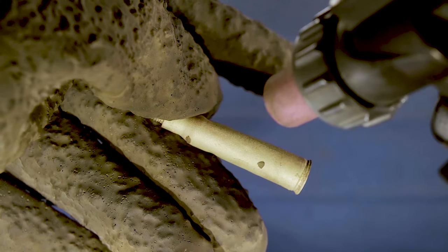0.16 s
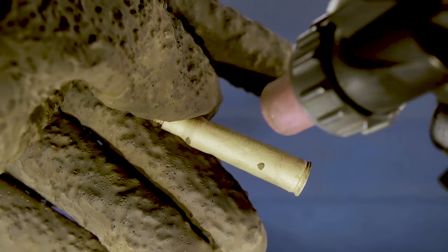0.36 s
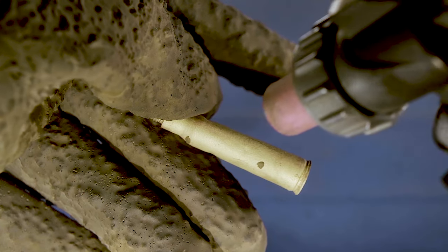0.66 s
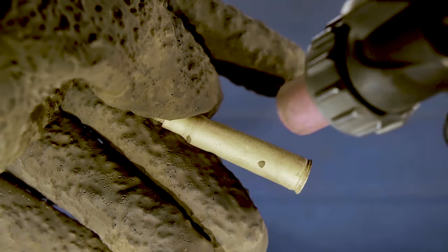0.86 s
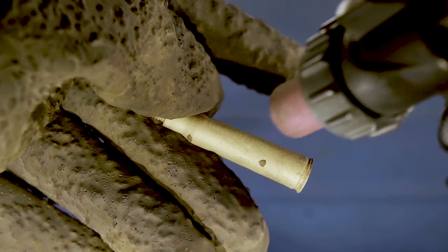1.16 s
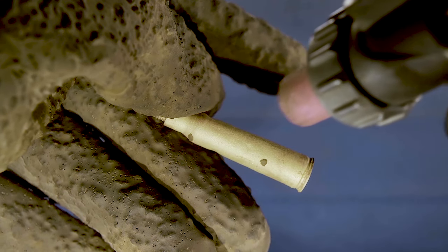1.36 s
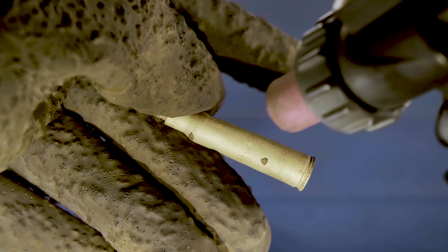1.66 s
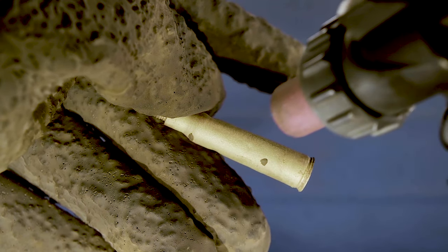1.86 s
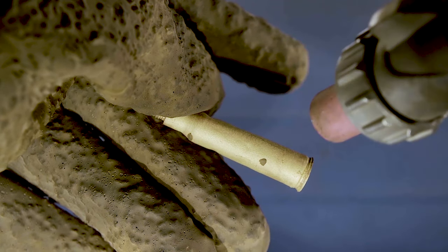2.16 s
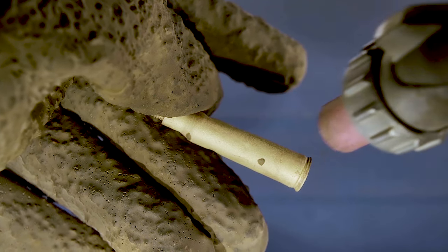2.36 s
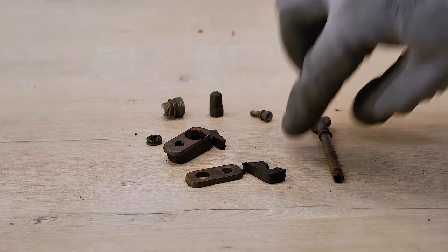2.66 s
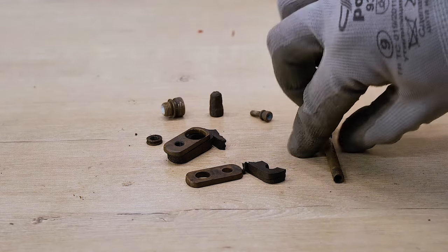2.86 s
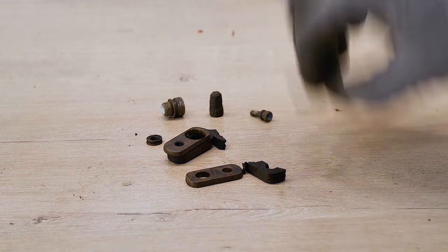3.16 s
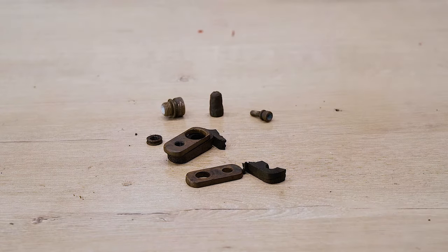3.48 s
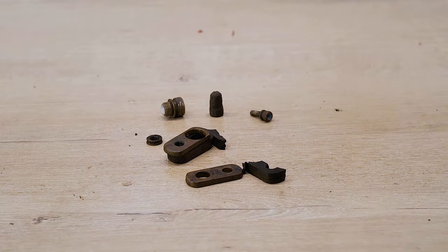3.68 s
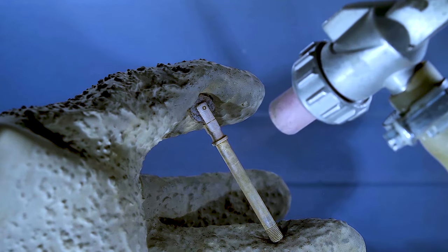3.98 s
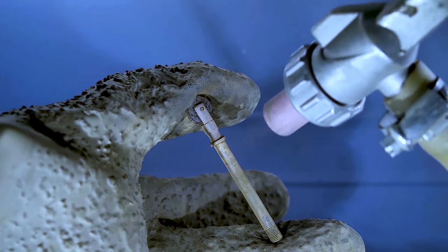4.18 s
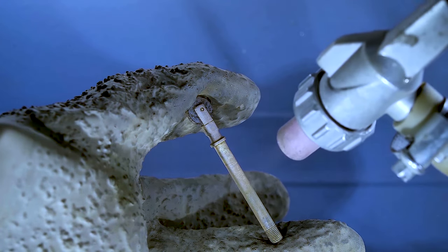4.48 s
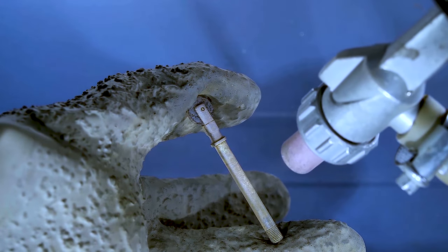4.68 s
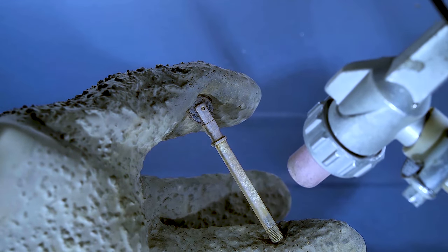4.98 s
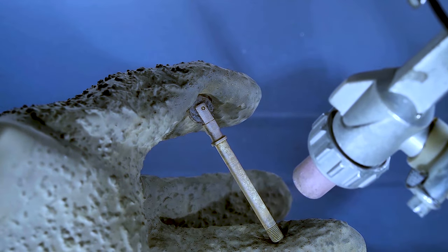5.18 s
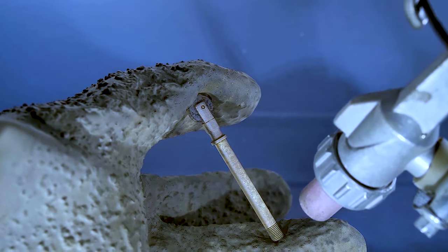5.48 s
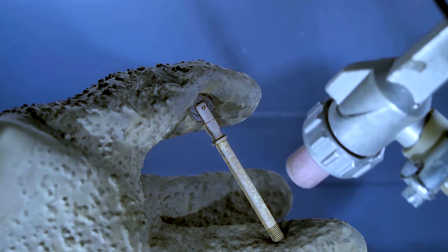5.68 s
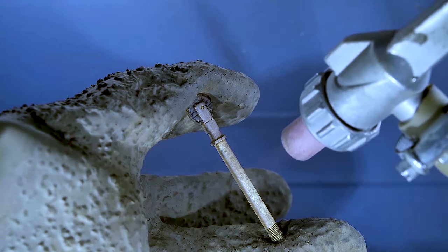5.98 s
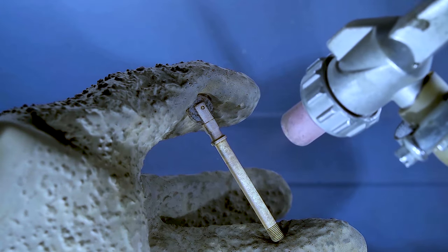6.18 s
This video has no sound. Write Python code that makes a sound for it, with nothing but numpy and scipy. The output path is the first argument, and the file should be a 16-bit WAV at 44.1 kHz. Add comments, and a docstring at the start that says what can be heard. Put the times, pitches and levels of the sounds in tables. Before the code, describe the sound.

A sandblaster spits once, then hisses steadily against a small brass case, with a slight ringing edge and a faint compressor hum beneath. It cuts off. In the quiet, a gloved hand picks a steel bolt off a wooden bench with a small rattling knock. A soft rush swells into a second, smoother and brighter blast with faint whistles and a low motor drone, heard close up in a workshop cabinet.

```python
"""A spit of hiss, a short gap, then steady sandblasting: turbulent air and grit excite the resonances
of a brass case in a workshop cabinet while a compressor hums. In a quiet pause a steel bolt is picked
off a wooden bench, whose damped modes sound as a knock, and a soft rush swells. Then the bolt is
blasted with a smoother, brighter jet over the beating drone of the extractor's two motors.
Now and then the jet catches an edge and whistles."""
import sys
import numpy as np
from scipy import signal
from scipy.fft import rfft, irfft, next_fast_len
from scipy.io import wavfile
from scipy.ndimage import map_coordinates

SR = 44100
rng = np.random.default_rng(int(sys.argv[2]) if len(sys.argv) > 2 else 0)


def unload_audio(sound):
    """Save the sound as a 16-bit wav file, at the path given as the first command line argument."""
    columns = np.transpose(np.atleast_2d(sound))
    # keep every value between -1 and 1, then stretch to whole-number steps
    steps = np.round(np.clip(columns, -1, 1) * 32767)
    wavfile.write(sys.argv[1], SR, steps.astype(np.int16))


N = 279594
T = np.arange(N) / SR
FFT_SIZE = next_fast_len(N, True)
HZ = np.maximum(np.arange(FFT_SIZE // 2 + 1) * SR / FFT_SIZE, 1)
CASE_END_S, BOLT_START_S = 2.555, 3.803   # the pause lies between them
HALF_EACH_SIDE = np.array([[.5], [-.5]])   # shares out a left-minus-right difference


def from_db(db):
    """Amplitude ratio: a factor of ten for every 20 dB."""
    return np.exp(np.asarray(db) * (np.log(10) / 20))


def rms_one(x):
    """Normalisation to unit mean power."""
    return x / np.sqrt(np.mean(x ** 2) + 1e-20)


def at_hz(points):
    """Interpolation of a table along a logarithmic frequency axis."""
    hz, value = np.transpose(points)
    return np.interp(np.log(HZ), np.log(np.sort(hz)), value)


def to_sound(spectrum):
    """Fourier synthesis of a stereo signal."""
    return irfft(spectrum, FFT_SIZE)[:, :N]


def after(s):
    """A unit step spread over 4 ms."""
    return np.clip((T - s) / .004 + .5, 0, 1)


def ramp(start_s, rise_s):
    """Linear rise from 0 to 1, then held."""
    return np.clip((T - start_s) / rise_s, 0, 1)


def stroke(peak_s, level_db, rise_s, fall_s):
    """Exponential growth and decay: 60 dB in rise_s and in fall_s."""
    return from_db(level_db - 60 * np.maximum((peak_s - T) / rise_s, (T - peak_s) / fall_s))


def drift(rate_hz):
    """Low-passed noise: a slow random fluctuation of unit rms."""
    step, settle = 40, 2000
    pole = np.exp(-2 * np.pi * rate_hz * step / SR)
    white = rng.standard_normal(N // step + settle + 2)
    slow = signal.lfilter([1], [1, -2 * pole, pole * pole], white)[settle:]
    return np.interp(np.arange(N) / step, np.arange(len(slow)), rms_one(slow))


def coloured(source, colour, correlation):
    """Partial coherence: sum and difference of two independent sources, filtered, at unit rms."""
    mid, side = rfft(source, FFT_SIZE)
    pair = np.sqrt(1 + correlation) * mid + np.sqrt(1 - correlation) * side * [[1], [-1]]
    low_cut = np.minimum(HZ / colour[0][0], 1) ** 2
    high_cut = 1 / (1 + (HZ / colour[-1][0]) ** 40)
    return rms_one(to_sound(pair * low_cut * high_cut * from_db(at_hz(colour))))


def noise(colour, correlation):
    """Gaussian stereo noise with a given spectral envelope."""
    return coloured(rng.standard_normal((2, N)), colour, correlation)


def resonance(x, hz, width_hz):
    """A damped resonator: two-pole band-pass with unit peak gain."""
    r = np.exp(-np.pi * width_hz / SR)
    feedback = [1, -2 * r * np.cos(2 * np.pi * hz / SR), r * r]
    return signal.lfilter(np.array([1, 0, -1]) * (1 - r * r) / 2, feedback, x)


def band(x, hz, width_hz):
    """Two resonators in cascade pass a band with steeper skirts, at unit rms."""
    return rms_one(resonance(resonance(x, hz, width_hz), hz, width_hz))


def resonate(x, rings, wander_db):
    """Resonant filters of fluctuating strength lift or hollow narrow bands."""
    return x + sum((from_db(lift_db) - 1) * from_db(wander_db * drift(2.5)) * resonance(x, hz, width)
                   for hz, width, lift_db in rings)


def background():
    """Noise floor: faint noise in the pause, strongest at the lowest frequencies."""
    # spectrum of the background noise: (frequency [Hz], relative level [dB])
    colour = [(5, -6), (12, -16.5), (40, -23.5), (85, -30), (160, -43.5), (700, -45), (2000, -49.5),
              (10500, -52)]
    return from_db(-73.5) * noise(colour, correlation=.27) * after(CASE_END_S)


def draught():
    """The extractor's airflow: low noise that decays exponentially under the second blast."""
    # spectrum of the airflow: (frequency [Hz], relative level [dB])
    colour = [(20, -16), (70, -8), (170, -5.5), (260, -3)]
    fade_db = 5 * np.maximum(T - BOLT_START_S, 0)
    return from_db(-69.5 - fade_db) * noise(colour, correlation=.36) * after(BOLT_START_S)


def machine(base_hz, tones):
    """Rotation is periodic: harmonics stay locked to the wavering shaft while their levels throb."""
    speed_waver, throb_db = .0004, 1.1
    turns = np.cumsum(base_hz * (1 + speed_waver * drift(1.4))) / SR
    hum = 0
    for harmonic, level_db in tones:
        amplitude = np.sqrt(2) * from_db(level_db + throb_db * drift(1.8))
        hum = hum + amplitude * np.sin(2 * np.pi * (harmonic * turns + rng.random()))
    return hum


def compressor():
    """Harmonic series of compressor and fan over a broadband rumble, heard until the pause."""
    # partials of compressor and fan: (harmonic number, level [dB])
    tones = [(1, -81), (4, -74), (5, -78), (6, -79), (7, -73), (8, -65.7), (10, -77), (11, -70.5),
             (12, -72.5), (18, -71), (28, -77)]
    fan_tones = [(1, -72.5), (3, -78)]
    # spectrum of the rumble: (frequency [Hz], relative level [dB])
    colour = [(30, -6), (120, -16), (160, -1), (220, -22), (350, -4.5), (540, 1), (690, -7), (830, -8.5),
              (1000, -17.5), (2050, -14.5), (2220, -22.5), (3200, -29), (3800, -35), (5150, -20.5),
              (5500, -36), (6200, -42), (13000, -47)]
    # its resonances: (frequency [Hz], bandwidth [Hz], lift [dB])
    rings = [(2710, 77, 11.5), (5660, 40, 10)]
    rumble = from_db(-63) * resonate(noise(colour, correlation=.97), rings, wander_db=3)
    hum = machine(base_hz=39.965, tones=tones) + machine(base_hz=176, tones=fan_tones)
    idle_gain = from_db(3.3 * (1 - after(.29)))   # a little stronger before the long blast
    return idle_gain * (hum + rumble) * (1 - after(CASE_END_S))


def extractor():
    """Beats: two motors at slightly different speeds interfere, beside the tone of a fan."""
    # partials of the two motors and the fan: (harmonic number, level [dB])
    tones = [(1, -79.5), (2, -71.8), (3, -74.5), (5, -66.2), (7, -74.5), (8, -68.5), (9, -75.5),
             (11, -76.5), (14, -75.5)]
    twin_tones = [(1, -78), (2, -79.5), (5, -66.2), (8, -75.5), (10, -77.5), (14, -74.5)]
    fan_tones = [(3, -74.5)]
    motors = machine(base_hz=115, tones=tones) + machine(base_hz=117.53, tones=twin_tones)
    return (motors + machine(base_hz=176, tones=fan_tones)) * after(BOLT_START_S)


def glove():
    """Friction noise: the glove brushes the bench in short, uneven strokes."""
    # strokes: (peak time [s], level [dB], rise time [s], fall time [s])
    strokes = [(2.627, -76.5, .006, .12), (2.978, -75, .13, .05)]
    # spectrum of the rustle: (frequency [Hz], relative level [dB])
    colour = [(400, -6), (2500, -10), (4400, -2), (6500, -13), (11000, -10)]
    envelope = sum(stroke(*row) for row in strokes) * from_db(2 * drift(40.1))
    return envelope * noise(colour, correlation=.56)


def swell():
    """A soft rush grows and turns hollow as a band-passed core joins it."""
    # spectrum of the rush: (frequency [Hz], relative level [dB])
    colour = [(200, -13), (500, 2), (1500, 4.5), (2700, 3), (3900, 1), (4900, -16), (13500, -15)]
    source = noise(colour, correlation=.76)
    rush = from_db(-61.5) * ramp(3.617, rise_s=.2) * source
    core = from_db(-61) * ramp(3.68, rise_s=.081) * band(source, hz=1480, width_hz=1050)
    scuffing = from_db(1.8 * drift(35))
    return (rush + core) * scuffing


def hand_press(s, level_db, hz, rise_s, t60):
    """Damped oscillation: the hand comes down and sets the bench top swaying."""
    t = np.maximum(T - s, 0)
    return from_db(level_db - 60 * t / t60) * ramp(s, rise_s) * np.sin(2 * np.pi * hz * t)


def hand_taps():
    """Light impacts as the hand leaves the bench: a broad tick dies sooner than a narrow ring."""
    # taps: (time [s], level [dB])
    taps = [(3.297, -82), (3.334, -85)]
    sound = 0
    for s, level_db in taps:
        ring = rms_one(resonance(rng.standard_normal(N), hz=905, width_hz=170))
        tick = band(rng.standard_normal(N), hz=1100, width_hz=800)
        sound = sound + ring * stroke(s, level_db, rise_s=.003, fall_s=.15)
        sound = sound + tick * stroke(s, level_db + 1, rise_s=.003, fall_s=.05)
    return sound


def touch(s, level_db, cutoff_hz):
    """A low-passed impulse: the softer the contact of bolt and wood, the duller the click."""
    impulse = np.zeros(N)
    impulse[round(s * SR)] = from_db(level_db)
    pole = np.exp(-2 * np.pi * cutoff_hz / SR)
    return signal.lfilter([1 - pole], [1, -pole], impulse + 1e-18)


def bench_knock():
    """Convolution: each touch of the rattling bolt excites the impulse response of bench and room."""
    # contacts: (time [s], relative level [dB], cutoff [Hz])
    contacts = [(2.9843, -4, 1104), (2.9911, 7, 4560), (2.994, -12, 9000), (3.002, -17, 1500),
                (3.003, -4, 9000), (3.012, -4, 2500), (3.021, -12, 6000), (3.028, -7, 1200),
                (3.036, -11, 900), (3.043, -13, 9000), (3.073, -23, 4000)]
    # modes of bolt and bench top: (frequency [Hz], relative level [dB], 60 dB decay time [s])
    bench_modes = [(46, -18, 0.48), (672, -15.5, .2), (759, -18, .18), (862, -11, 0.16), (967, -14, .22),
                   (1067, -12, .21), (1275, -7.5, 0.17), (1345, -7.5, .14), (1457, 1.5, 0.08),
                   (3245, -3.5, 0.06), (3320, -5, 0.05), (3950, -7, 0.07), (4070, -9, 0.08)]
    # dense ring of the wood: (frequency [Hz], relative level [dB])
    colour = [(70, -8), (200, -22), (400, -7), (650, -2.5), (1500, -1.5), (2500, -8.5), (2850, -22),
              (3300, -10), (4100, -17), (4600, -23), (13500, -37.5)]
    wood_t60_s, room_t60_s, contact_s = .025, .23, .00037
    clicks = sum(touch(*row) for row in contacts)
    t = T[:SR // 2]
    modes = sum((-1) ** k * from_db(db - 60 * t / t60) * np.sin(2 * np.pi * hz * t)
                for k, (hz, db, t60) in enumerate(bench_modes))
    wood = from_db(-58 - 60 * t / wood_t60_s) * noise(colour, correlation=.89)[:, :len(t)]
    room = from_db(-53 - 60 * t / room_t60_s) * noise(colour, correlation=.92)[:, :len(t)]
    onset = 1 - np.exp(-t / contact_s)   # the gloved hand softens each touch
    response = onset * (from_db(-53) * modes + wood + room)
    return signal.fftconvolve(clicks[None], response, axes=1)[:, :N]


def whistles():
    """Edge tones: narrow bands of hiss rise and fade while an edge is in the stream."""
    # whistles: (start [s], end [s], frequency [Hz], bandwidth [Hz], level [dB])
    edge_tones = [(1.55, 1.98, 4198, 65, -60.5), (2.15, 2.5, 1300, 40, -66), (3.85, 4.4, 4712, 90, -59.5),
                  (3.82, 4.35, 5290, 160, -63), (4.8, 5.08, 6820, 260, -61)]
    sound = 0
    for start, end, hz, width_hz, level_db in edge_tones:
        arch = np.sqrt(np.abs(np.sin(np.pi * ramp(start, end - start))))
        sound = sound + from_db(level_db) * arch * band(rng.standard_normal(N), hz, width_hz)
    return sound


def cabinet(x, echo_db, count=10):
    """Comb filtering: treble echoes off part, glove and walls change their paths as the hand sways."""
    sway_m, sound_m_per_s = .016, 343
    treble = signal.lfilter(*signal.butter(1, 2500, "high", fs=SR), x)
    lags_s = [lag + sway_m / sound_m_per_s * drift(.65) for lag in rng.uniform(.0006, .005, count)]
    echoes = sum((-1) ** k * map_coordinates(treble, [(T - lag) * SR], order=3)
                 for k, lag in enumerate(lags_s))
    return x + from_db(echo_db) * echoes / np.sqrt(count)


def grit(per_s, spread_db):
    """Shot noise: grains of uneven size strike at random."""
    sizes = from_db(spread_db * np.minimum(rng.exponential(1, (2, N)), 4))
    signs = rng.choice([-1, 1], (2, N))
    strikes = rng.random((2, N)) < per_s / SR
    return rms_one(sizes * signs * strikes)


def jet(colour, rings, coherence, grit_db, echo_db, wander_db, side_share):
    """Source and filter: turbulence and grit gain peaks and hollows; side_share of these go sideways."""
    stream = rng.standard_normal((2, N)) + from_db(grit_db) * grit(per_s=6000, spread_db=3)
    echoing = np.array([cabinet(x, echo_db) for x in stream])
    ringing = resonate(echoing, rings, wander_db) - stream
    mid_and_side = stream + np.array([[1], [side_share]]) * ringing
    return coloured(mid_and_side, colour, at_hz(coherence))


def nozzle_sweep(hiss, aim, rush_db, sizzle_db, rush_follows, feed_db):
    """Amplitude modulation: the wandering aim swings the sizzle above 7 kHz, and the rush below less."""
    spectrum = rfft(hiss, FFT_SIZE)
    low_pass = 1 / (1 + (HZ / 7000) ** 16)
    swing_db = np.interp(T, *np.transpose(aim))
    rush = from_db(rush_db + rush_follows * swing_db) * rms_one(to_sound(spectrum * low_pass))
    sizzle = from_db(sizzle_db + swing_db) * rms_one(to_sound(spectrum * (1 - low_pass)))
    return (rush + sizzle) * from_db(feed_db * drift(13))   # the abrasive feeds unevenly


def trigger():
    """Pressure builds as the valve opens; it snaps shut and the hiss dies away exponentially."""
    # pulls: (time fully open [s], time of release [s], gain [dB])
    pulls = [(0, 0.012, 2), (0.267, 2.553, -1)]
    open_db_per_s, tail_t60_s = 1300, .17
    tail_db = -17.5 - 7.5 * after(CASE_END_S)   # fainter where the pause begins
    gain = from_db(-46) * (1 - after(CASE_END_S))   # air slips past the shut valve
    for open_s, release_s, gain_db in pulls:
        opening = from_db(gain_db + open_db_per_s * np.minimum(T - open_s, 0))
        shut = ramp(release_s, rise_s=.0044)
        tail = from_db(tail_db - 60 * np.maximum(T - release_s, 0) / tail_t60_s)
        gain = gain + opening * (1 - shut + shut * tail)
    return gain


def off_centre(x):
    """Path difference: the nozzle is nearer the left, so its treble arrives there louder and earlier."""
    # level difference: (frequency [Hz], left minus right [dB])
    balance = [(2400, 0), (6000, 1.5), (10000, 2.5)]
    # phase difference: (frequency [Hz], lead of the left side [rad])
    lead = [(4000, 0.1), (5600, 1.3), (6300, 2.55)]
    gain = from_db(HALF_EACH_SIDE * at_hz(balance))
    phase_shift = np.exp(1j * HALF_EACH_SIDE * at_hz(lead))
    return to_sound(rfft(x, FFT_SIZE) * gain * phase_shift)


def case_blast():
    """Forced vibration: the cabinet and the hollow brass case ring under the jet."""
    # hiss as heard, with a dip near 11 kHz and a steep treble cut: (frequency [Hz], relative level [dB])
    colour = [(150, -17), (400, -13), (1000, -11.5), (2600, -8.8), (3100, -6), (4500, -5), (5050, -2),
              (5900, -6), (8300, -2.2), (10650, 0.3), (10950, -9), (11700, -4.3), (13580, -5.5),
              (13780, -37)]
    # narrow peaks and hollows in the hiss: (frequency [Hz], bandwidth [Hz], lift [dB])
    rings = [(850, 70, 4), (1310, 90, 3), (1650, 250, 3), (3130, 130, 4), (3275, 70, 4), (3380, 70, -5),
             (3560, 200, 3), (3860, 140, -3), (4202, 60, 7), (4890, 130, 4.2), (5080, 280, 3),
             (6050, 140, -2), (6660, 195, 4.5), (6980, 110, -3), (7830, 280, -2.2), (8260, 90, 6),
             (8512, 45, 6), (8900, 50, 4), (10420, 60, 4)]
    # likeness of left and right: (frequency [Hz], correlation)
    coherence = [(200, 0.264), (1000, 0.39), (3100, 0.64), (5800, 0.15), (8000, 0.49), (13000, 0.56)]
    # swing of the sizzle with the aim: (time [s], level [dB])
    aim = [(.28, -1), (.48, 1), (1.8, -1.7), (2.3, -1)]
    hiss = jet(colour, rings, coherence, grit_db=-2, echo_db=-7.3, wander_db=2.4, side_share=1)
    blast = nozzle_sweep(hiss, aim, rush_db=-42.5, sizzle_db=-41.5, rush_follows=.35, feed_db=.35)
    return trigger() * off_centre(blast)


def bolt_blast():
    """Nearly free jet noise: the thin bolt hardly disturbs the flow, so its resonances are weak."""
    # hiss as heard, with a steep treble cut: (frequency [Hz], relative level [dB])
    colour = [(100, -17.5), (300, -7), (600, -3), (1300, -5), (2400, -5), (4000, -4), (6000, -3),
              (7300, -0.3), (9900, 1), (11500, 0.5), (15650, 3), (16000, -35)]
    # narrow peaks in the hiss: (frequency [Hz], bandwidth [Hz], lift [dB])
    rings = [(1700, 320, 1.8), (4715, 90, 4), (5270, 170, 2), (6780, 130, 3), (8300, 170, 3),
             (9400, 250, 2.8), (10743, 280, 3)]
    # likeness of left and right: (frequency [Hz], correlation)
    coherence = [(500, 0.22), (1700, 0.21), (2400, 0.074), (4900, 0.24), (9000, 0.25), (12000, 0.11)]
    # swing of the sizzle with the aim: (time [s], level [dB])
    aim = [(3.83, 0.31), (5.05, 0.97), (5.65, -0.94), (6.15, 1.8)]
    hiss = jet(colour, rings, coherence, grit_db=-3, echo_db=-9.5, wander_db=3.5, side_share=.4)
    blast = nozzle_sweep(hiss, aim, rush_db=-47.5, sizzle_db=-43.5, rush_follows=.55, feed_db=.55)
    return blast * from_db(.4 * HALF_EACH_SIDE) * after(BOLT_START_S)


def scene():
    """Superposition of the sources: a blast, a pause with a knock, a second blast."""
    handling = bench_knock() + hand_taps()
    handling += hand_press(2.885, level_db=-60.5, hz=42, rise_s=.03, t60=.6)
    blasting = case_blast() + compressor() + bolt_blast() + extractor() + whistles() + draught()
    pause = (background() + glove() + swell()) * (1 - after(BOLT_START_S))
    return blasting + handling + pause * from_db(-.5 * HALF_EACH_SIDE)


def record(dry):
    """A steady offset in the pause gives a soft thud at either end; a steep low-pass cuts the top."""
    offset, cutoff_hz = np.array([[-.0019], [-.0042]]), 15800
    in_pause = after(CASE_END_S) - ramp(BOLT_START_S, rise_s=.022)
    low_pass = 1 / np.sqrt(1 + (HZ / cutoff_hz) ** 400)
    return to_sound(rfft(dry + offset * in_pause, FFT_SIZE) * low_pass)


dry = scene()
out = record(dry)
unload_audio(out)
```